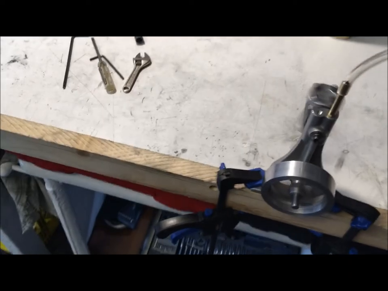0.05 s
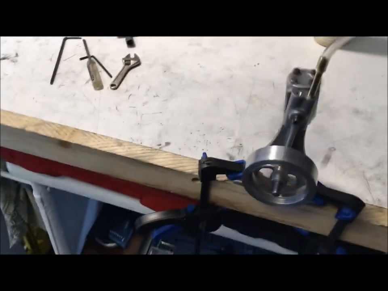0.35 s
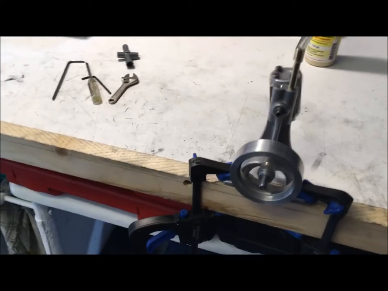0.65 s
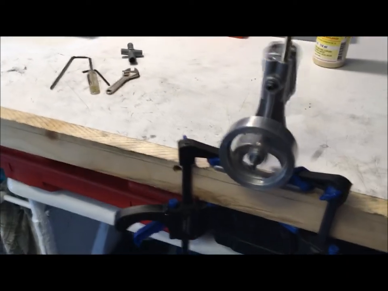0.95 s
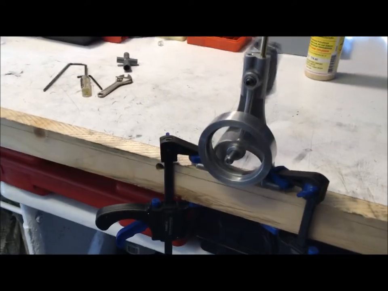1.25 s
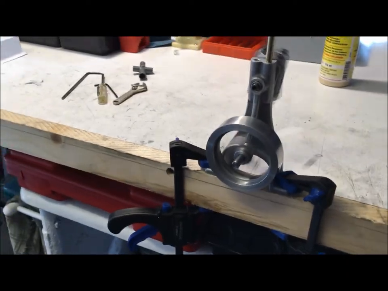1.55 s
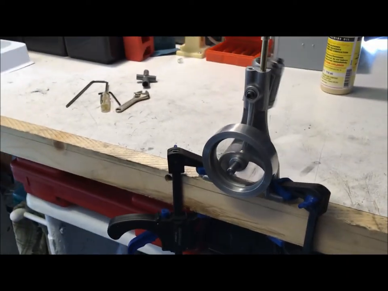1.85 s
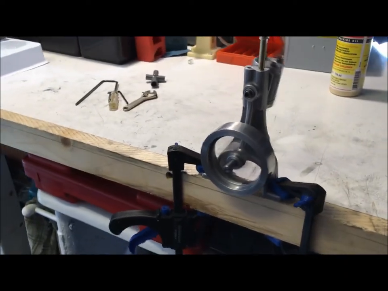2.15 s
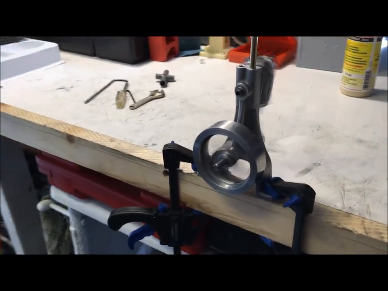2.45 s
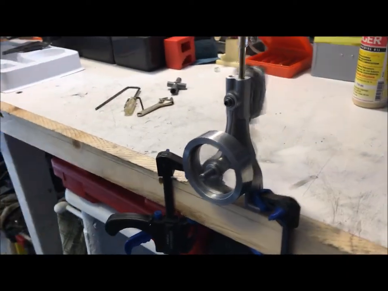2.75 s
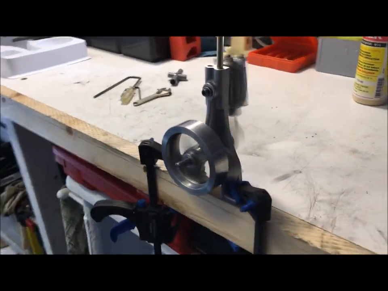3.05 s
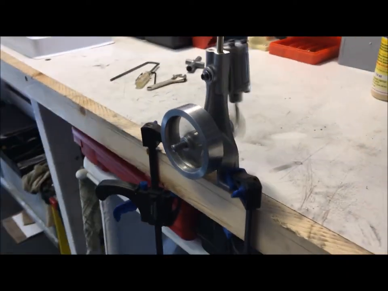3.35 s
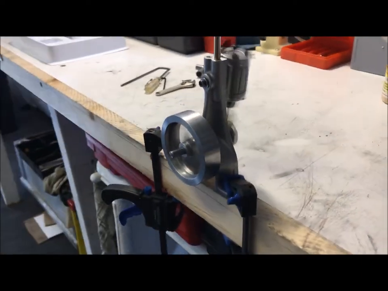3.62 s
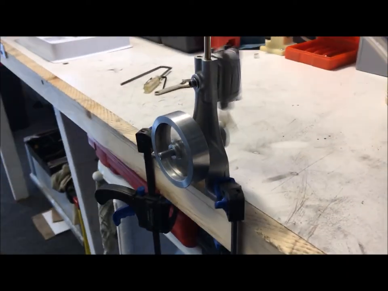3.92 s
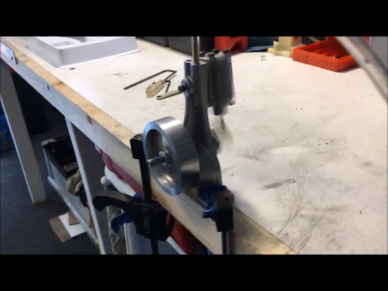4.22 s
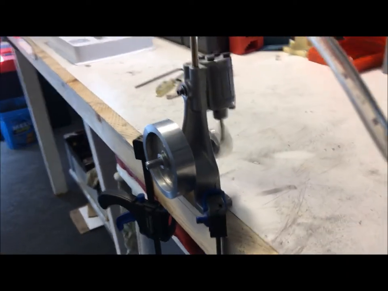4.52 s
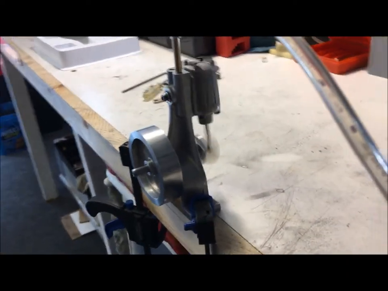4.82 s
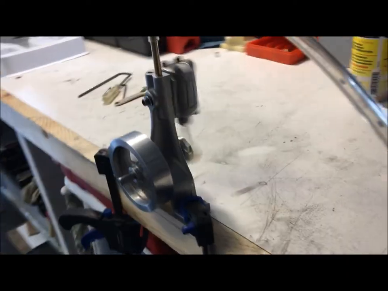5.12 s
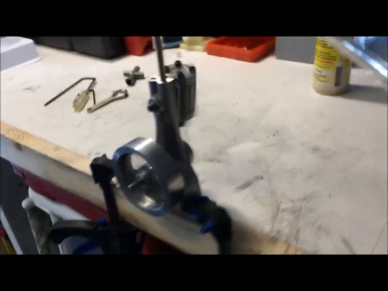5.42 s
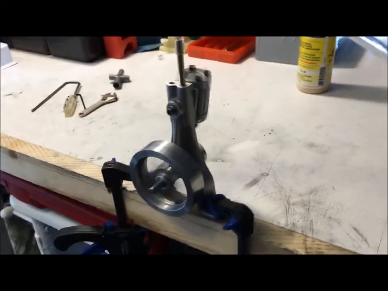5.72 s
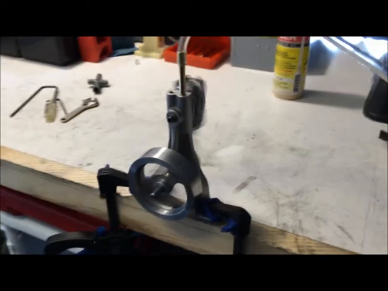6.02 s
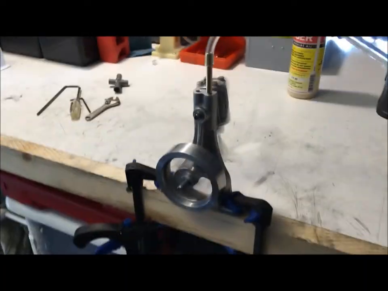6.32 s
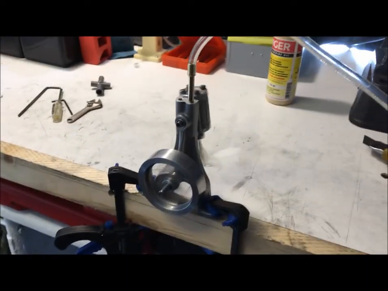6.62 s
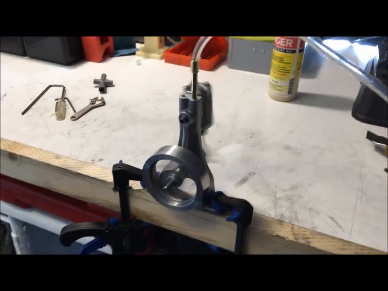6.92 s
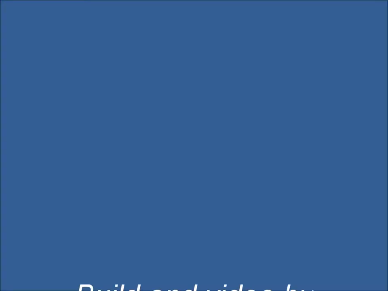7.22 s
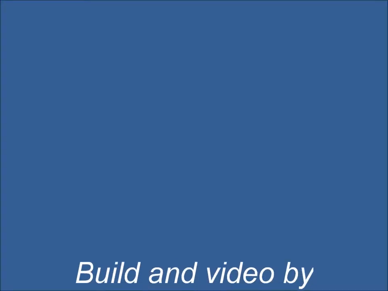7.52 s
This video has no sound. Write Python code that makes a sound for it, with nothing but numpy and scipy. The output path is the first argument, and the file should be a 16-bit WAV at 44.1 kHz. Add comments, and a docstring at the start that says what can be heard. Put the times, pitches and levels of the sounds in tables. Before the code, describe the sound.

From the very start, a small model steam engine runs on compressed air at a steady pace of about sixteen turns a second. Each turn repeats the same tight cluster of knocks and light metallic pings, with a raspy piston rub and two hissing puffs, blending into a fast, even chatter. The wooden bench resonates underneath, in a small workshop with short reflections and faint background noise. The close hand-held microphone shifts with a faint low rumble and takes a very soft bump near 0.8 seconds. As it moves to the side, around 3.5 to 5 seconds, the engine sounds slightly hollower and more popping. A gradual fade begins at about 4.5 seconds. The hiss swells briefly near 5.5 seconds, followed by a second soft, deep bump. The engine keeps its speed while fading to silence at about 7 seconds.

```python
"""A small workshop: a model oscillating-cylinder steam engine, clamped to a wooden bench, runs on
compressed air at about 16 turns a second. In every turn the slack in its bearings knocks in the same
pattern and rings frame and bench, the piston rubs, and the ports let out two puffs of air.
A hand-held microphone moves round it, shifts in the hand and is bumped twice; the sound fades out."""
import sys
import numpy as np
from scipy import signal
from scipy.fft import rfft, irfft, next_fast_len
from scipy.io import wavfile

SR = 44100
rng = np.random.default_rng(int(sys.argv[2]) if len(sys.argv) > 2 else 0)


def put_to_file(sound):
    """Save the sound as 16-bit audio at rate SR, in the file named by the first command-line argument."""
    columns = np.atleast_2d(sound).T  # one column per channel
    safe = np.clip(columns, -1, 1)
    whole_steps = np.round(safe * 32767)
    wavfile.write(sys.argv[1], SR, whole_steps.astype(np.int16))


N = 338247
TIME = np.arange(N) / SR


def from_db(db):
    """Decibels to gain."""
    return 10 ** (np.asarray(db) / 20)


def rms_one(x):
    """Scale to rms 1."""
    return x / np.sqrt(np.mean(x ** 2) + 1e-20)


def in_time(rows):
    """Table columns as curves in time."""
    times_s, *columns = np.transpose(rows)
    return [np.interp(TIME, times_s, column) for column in columns]


def noise(colour):
    """Noise of the given spectrum, rolled off below 20 Hz, rms 1."""
    size = next_fast_len(N)
    hz, db = np.transpose(colour)
    bins_hz = np.maximum(np.fft.rfftfreq(size, 1 / SR), 1)
    gain = from_db(np.interp(np.log(bins_hz), np.log(hz), db))
    gain *= bins_hz ** 2 / (bins_hz ** 2 + 20 ** 2)
    return rms_one(irfft(rfft(rng.standard_normal(size)) * gain, size)[:N])


def band(x, low_hz, high_hz):
    """Band-pass, order 2."""
    sos = signal.butter(2, [low_hz, high_hz + 1], "band", fs=SR, output="sos")
    return signal.sosfilt(sos, x + 1e-18)


def ring(x, hz, t60_s):
    """One mode: a unit click starts a decaying sine of height 1."""
    r, w = np.exp(-np.log(1000) / (t60_s * SR)), 2 * np.pi * hz / SR
    return signal.lfilter([0, np.sin(w)], [1, -2 * r * np.cos(w), r * r], x + 1e-18)


# microphone comes down in front, backs off, goes to the side and returns to the front:
# (time [s], distance [m], side [0-1], overhead [0-1])
MIC_PATH = [(0, 0.29, 0, 0.91), (1.0, 0.35, 0, 0.14), (2.4, 0.37, 0.28, 0), (3.85, 0.43, 0.94, 0),
            (4.85, .45, .95, 0.02), (5.8, 0.51, 0.35, 0), (7, 0.52, 0.03, 0.06)]
# part: (front level at 0.3 m [dB], distance exponent [-], side gain [dB], overhead gain [dB])
PART_RADIATION = {"bench legs": (.8, 0.94, .4, 0.013), "bench top": (0.5, 1.48, -0.8, -0.8),
                  "base": (2, 1.36, -4, 0), "frame": (3.5, 1.47, -2.5, -9),
                  "cylinder": (9.5, 3, -1.5, -3.5), "rim": (11.5, 0, -9, -15), "clamp": (0, 0, -1, 15.5),
                  "ping": (10.5, 1.67, -14.5, -16), "cavity": (-8.5, 0.87, 18, -1),
                  "rasp": (5.5, 1.7, -1.8, -2.2), "exhaust": (0.35, 0.67, 0, -1),
                  "inlet": (1.7, 1.02, -0.5, -7), "whistle": (2, 0.9, -2, 2),
                  "top of the hiss": (5.5, 3.5, -1.5, 0.5)}
def heard_db(part):
    """Level of a part at the moving microphone, by distance and direction."""
    distance_m, side, overhead = in_time(MIC_PATH)
    front_db, exponent, side_db, overhead_db = PART_RADIATION[part]
    return front_db - exponent * 20 * np.log10(distance_m / 0.3) + side_db * side + overhead_db * overhead


# (time [s], speed [turns/s])
FLYWHEEL_SPEED = [(0, 16.288), (2.7, 16.3337), (3.6, 16.2003), (4.8, 16.2937), (5.5, 16.1013), (7, 16.199)]
def flywheel(start_turn):
    """Running angle in turns; at speed from the start."""
    turns_per_s, = in_time(FLYWHEEL_SPEED)
    return start_turn + np.cumsum(turns_per_s) / SR


def knocks(turns, contacts, uneven_db, jitter_s):
    """Contact force: one band-limited click per contact and turn, with random scatter."""
    each_turn, force = np.arange(int(turns[-1])), np.zeros(N)
    for phase, db, low_hz, high_hz in contacts:
        late, harder = rng.standard_normal((2, len(each_turn)))
        at_s = np.interp(each_turn + phase, turns, TIME) + jitter_s * late
        clicks = np.zeros(N)
        clicks[np.clip(np.round(at_s * SR).astype(int), 0, N - 1)] = from_db(db + uneven_db * harder)
        force += band(clicks, low_hz, high_hz)
    return force


# piston, crank pin and bearings: (phase [turns], level [dB], low edge [Hz], high edge [Hz])
SLACK_KNOCKS = [(0.027, 5, 78.6, 1747), (0.0528, 7.5, 271.4, 2910), (0.1048, -1, 73.6, 3470),
                (0.1619, -3.5, 78.8, 4139), (0.2343, -3.5, 290.7, 3520), (0.3457, -23.5, 47, 436),
                (0.51, -2, 264, 2453), (0.666, -7.5, 599, 2637), (0.8279, -7.5, 353, 3800)]
# bench, clamps and frame: (frequency [Hz], level [dB], t60 [s])
BODY_MODES = [(82.7, -52, 0.38), (109.44, -49.5, 0.39), (173.4, -59, 0.25), (216.7, -52.5, 0.57),
              (247, -51, 0.11), (309.8, -43, 0.19), (384.4, -37.5, 0.18), (516.6, -46, 0.15),
              (595, -41, 0.022), (606.8, -46, 0.15), (618.4, -43, 0.038), (847.7, -32.5, 0.025),
              (892.6, -37, 0.033), (956, -34, 0.045), (1031, -31, 0.016), (1142.7, -46, 0.24),
              (1296, -53, 0.047), (1428, -59.5, 0.24), (1669, -46, 0.017), (2000, -56, 0.029),
              (2353, -46.5, 0.05), (2728, -46, 0.028), (3548, -36.5, 0.0023)]
def body(turns):
    """Bearing slack knocks engine and bench; each mode radiates from one part, by frequency."""
    force = knocks(turns, SLACK_KNOCKS, uneven_db=0.25, jitter_s=8e-6)
    gains = from_db([heard_db(part) for part in ("bench legs", "bench top", "base", "frame", "cylinder")])
    splits_hz = [190, 450, 750, 1250]
    out = np.zeros(N)
    for k, (hz, db, t60_s) in enumerate(BODY_MODES):
        out += (-1) ** k * from_db(db) * gains[np.searchsorted(splits_hz, hz)] * ring(force, hz, t60_s)
    return out


def struck(part, force, modes):
    """Modes of one struck part, at the microphone."""
    return from_db(heard_db(part)) * sum(from_db(db) * ring(force, hz, t60_s) for hz, db, t60_s in modes)


# (phase [turns], level [dB], low edge [Hz], high edge [Hz])
STROKE_JOLT = [(.053, -3.5, 398, 2510)]
# both: (frequency [Hz], level [dB], t60 [s])
RIM_MODES = [(848, -49, 0.31), (1008, -54.5, 0.27)]
CLAMP_MODES = [(630, -50.5, 0.11)]
def power_stroke(turns):
    """The stroke jolts the flywheel: the rim sings, the clamp rings hollow."""
    force = knocks(turns, STROKE_JOLT, uneven_db=0.25, jitter_s=8e-6)
    return struck("rim", force, RIM_MODES) + struck("clamp", force, CLAMP_MODES)


# (phase [turns], level [dB], low edge [Hz], high edge [Hz])
PISTON_SLAPS = [(.205, -1, 787, 5130), (0.522, -8.5, 800, 5000), (.67, 1.5, 810, 5000)]
# (frequency [Hz], level [dB], t60 [s])
CYLINDER_MODES = [(1806, -36.5, 0.025), (2020, -55.5, 0.037), (2550, -49.5, 0.013)]
def piston_slap(turns):
    """The piston slaps the bore; the cylinder pings."""
    return struck("ping", knocks(turns, PISTON_SLAPS, uneven_db=0, jitter_s=40e-6), CYLINDER_MODES)


# (frequency [Hz], density [dB])
RUBBING_SPECTRUM = [(400, -20), (1200, 6), (2000, -4.5), (2700, -2.5), (3600, -1.5), (4300, -12),
                    (5200, -18.5), (9000, -22.5)]
def rubbing(turns, level_db, mid_stroke_turn=0.24, dead_point_db=-16.5, return_db=-1.5):
    """Friction of piston and port face swells with piston speed, twice a turn."""
    velocity = np.cos(2 * np.pi * (turns - mid_stroke_turn))
    friction = from_db(dead_point_db) + velocity ** 2 * from_db(return_db * (velocity < 0))
    return from_db(level_db + heard_db("rasp")) * friction * noise(RUBBING_SPECTRUM)


# (phase [turns], level [dB], low edge [Hz], high edge [Hz])
AIR_KICKS = [(.058, -3, 380, 1000), (.11, -6, 379, 1000), (.66, -4.5, 380, 1000)]
def cavity_pop(turns, hz, t60_s, level_db):
    """Kicks of air ring the cylinder's cavity, clearest from the side."""
    kicks = knocks(turns, AIR_KICKS, uneven_db=0.6, jitter_s=20e-6)
    return from_db(level_db + heard_db("cavity")) * ring(kicks, hz, t60_s)


def port_flow(turns, opens, rise, hold, closes, fall_db_per_turn, leak_db, shut_db, uneven_db):
    """The rocking cylinder gates a port: flow rises, holds, falls to a leak, shuts. Times in turns."""
    turn, phase = np.divmod(turns - opens, 1)
    opening = np.clip(np.minimum(phase, closes - opens - phase) / rise, 0, 1)
    decay = from_db(-fall_db_per_turn * np.maximum(phase - rise - hold, 0))
    pressure = np.hypot(decay, from_db(leak_db))
    strength = from_db(uneven_db * rng.standard_normal(int(turns[-1]) + 2))[turn.astype(int)]
    return strength * np.hypot(opening * pressure, from_db(shut_db))


# (frequency [Hz], bandwidth [Hz], level [dB])
PORT_RESONANCES = [(7240, 370, 0.5), (8500, 940, -8), (10780, 500, 0), (12600, 820, -7.5)]
def air_jet(part, spectrum, whistle_db, sputter_db):
    """A jet, broken up by oil in the ports, rasps, hisses and rings them."""
    sputter = from_db(sputter_db * rms_one(band(rng.standard_normal(N), 150, 1100)))
    ringing = sum(from_db(db) * rms_one(ring(rng.standard_normal(N), hz, np.log(1000) / (np.pi * width_hz)))
                  for hz, width_hz, db in PORT_RESONANCES)
    whistle = from_db(whistle_db + heard_db("whistle")) * band(ringing, 6200, 15000)
    jet = noise(spectrum)
    rasp = signal.sosfiltfilt(signal.butter(2, 5000, fs=SR, output="sos"), jet)
    swell_db = 4 * np.exp(-((TIME - 5.49) / 0.11) ** 2)   # the hiss swells briefly
    hiss = from_db(heard_db(part) + swell_db) * (jet - rasp)
    return sputter * (from_db(heard_db("rasp")) * rasp + hiss + whistle)


# (frequency [Hz], density [dB])
EXHAUST_SPECTRUM = [(100, -21), (400, -29), (900, -4), (2000, 3), (3300, 3), (4200, -1.5), (5000, -13.5),
                    (6300, -4.5), (8000, -1), (9600, -5), (11000, 12), (13000, 11), (15800, 1.5)]
def exhaust(turns, level_db):
    """Long puff after the power stroke."""
    flow = port_flow(turns, opens=0.0053, rise=0.036, hold=0.065, closes=0.67,
                     fall_db_per_turn=125.5, leak_db=-23.5, shut_db=-32.5, uneven_db=0.5)
    jet = air_jet("exhaust", EXHAUST_SPECTRUM, whistle_db=-12.5, sputter_db=1.5)
    return from_db(level_db) * flow * jet


# (frequency [Hz], density [dB])
INLET_SPECTRUM = [(100, -19.5), (400, -8), (900, -7.5), (2000, -5), (3500, -8.5), (4200, -7.5),
                  (5000, -17.5), (6300, -6.5), (8500, 2), (9600, 4), (11000, 11), (13000, 1.5), (15800, -7)]
def inlet(turns, level_db):
    """Short puff as the inlet opens, then leakage past the port face."""
    flow = port_flow(turns, opens=0.498, rise=0.045, hold=0.019, closes=0.97,
                     fall_db_per_turn=215.5, leak_db=-15, shut_db=-21.5, uneven_db=0.45)
    jet = air_jet("inlet", INLET_SPECTRUM, whistle_db=-7, sputter_db=1.2)
    return from_db(level_db) * flow * jet


def beamed(air, edge_hz):
    """The jets beam their highest treble, so it varies with microphone position."""
    wide = signal.sosfilt(signal.butter(3, edge_hz, fs=SR, output="sos"), air)
    return wide + from_db(heard_db("top of the hiss")) * (air - wide)


def bench_echo(x, low_hz, high_hz, lag_s_per_m):
    """One reflection off the bench top, later as the microphone backs off."""
    distance_m, _, _ = in_time(MIC_PATH)
    return np.interp(TIME - lag_s_per_m * distance_m, TIME, band(x, low_hz, high_hz))


def workshop(x, t60_s, gap_s, low_hz, high_hz):
    """Diffuse reflections from walls and clutter."""
    t = TIME[:SR // 2]
    decay = np.exp(-np.log(1000) * t / t60_s) * (t > gap_s)
    tail = band(rng.standard_normal(len(t)) * decay, low_hz, high_hz)
    return signal.fftconvolve(x, tail / np.sqrt(np.sum(tail ** 2)))[:N]


# (frequency [Hz], density [dB])
BACKGROUND_SPECTRUM = [(25, -11), (65, -3.5), (150, -8), (500, -7), (2000, -11), (16000, -21)]
def background(level_db):
    """Steady workshop noise."""
    return from_db(level_db) * noise(BACKGROUND_SPECTRUM)


# (time [s], level [dB], half-width [s])
MIC_BUMPS = [(0.302, -68.5, .3), (0.814, -65, .04), (5.597, -53, 0.017)]
def handling(low_hz, high_hz):
    """The hand shifts and bumps the microphone: soft, deep thuds through its case."""
    envelope = sum(from_db(db) * np.exp(-((TIME - at_s) / half_s) ** 2) for at_s, db, half_s in MIC_BUMPS)
    return envelope * rms_one(band(rng.standard_normal(N), low_hz, high_hz))


def scene():
    """Knocks, pings, rubbing and puffs follow the flywheel; bench and room reflect them."""
    turns = flywheel(start_turn=-0.1058)
    impacts = body(turns) + power_stroke(turns) + piston_slap(turns)
    engine = signal.sosfilt(signal.butter(6, 3670, fs=SR, output="sos"), impacts)   # oil softens contacts
    engine += rubbing(turns, level_db=-45.5)
    engine += cavity_pop(turns, hz=619, t60_s=0.041, level_db=-38.5)
    air = beamed(exhaust(turns, level_db=-32.5) + inlet(turns, level_db=-31.5), edge_hz=17600)
    room = from_db(-21) * bench_echo(engine, low_hz=657, high_hz=4000, lag_s_per_m=0.00572)
    room += from_db(-15.5) * workshop(engine, t60_s=0.4, gap_s=0.0023, low_hz=832, high_hz=5000)
    room += from_db(-14) * workshop(air, t60_s=0.12, gap_s=0.0037, low_hz=300, high_hz=15000)
    return (engine + air + room + handling(low_hz=24, high_hz=61.2) + background(level_db=-55.5))[None]


def record(dry):
    """Linear fade, muted just before its end; steep low-pass."""
    fade_start_s, fade_end_s, mute_s, cutoff_hz = 4.49, 7.133, 7.05, 16000
    fade = np.clip((fade_end_s - TIME) / (fade_end_s - fade_start_s), 0, 1)
    fade *= np.clip((mute_s - TIME) / 0.003, 0, 1)
    return signal.sosfilt(signal.ellip(12, 0.1, 80, cutoff_hz, fs=SR, output="sos"), dry * fade)


dry = scene()
out = record(dry)
put_to_file(out)
```